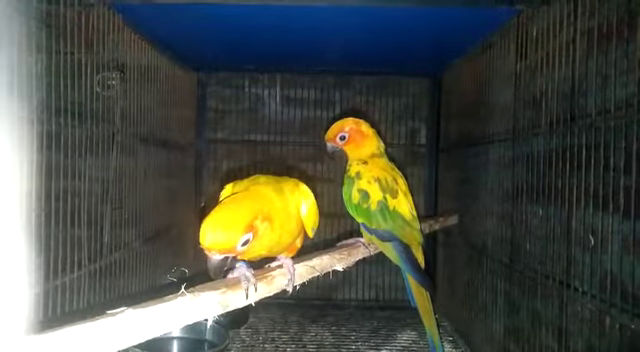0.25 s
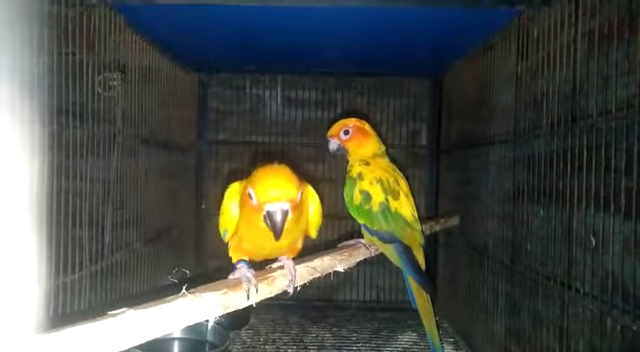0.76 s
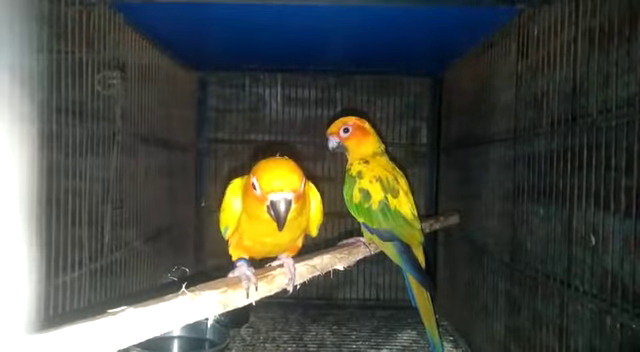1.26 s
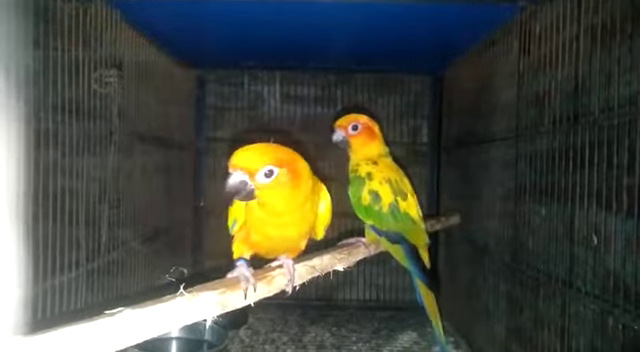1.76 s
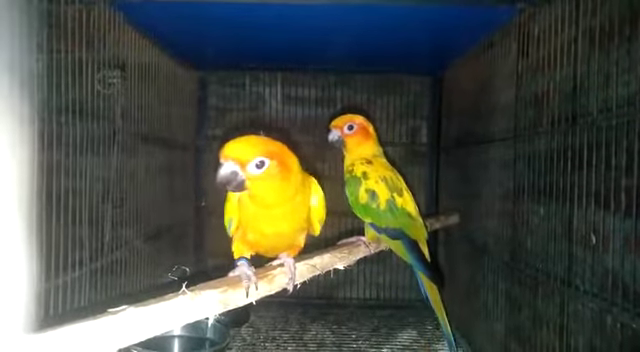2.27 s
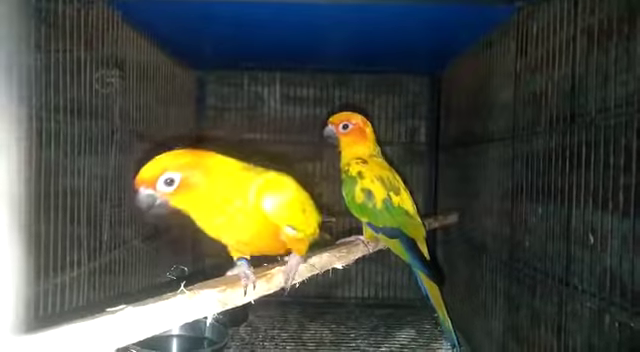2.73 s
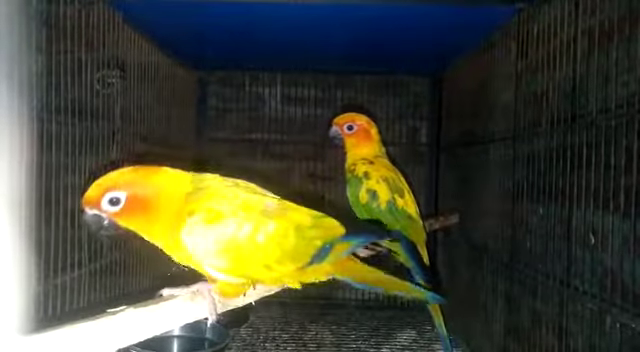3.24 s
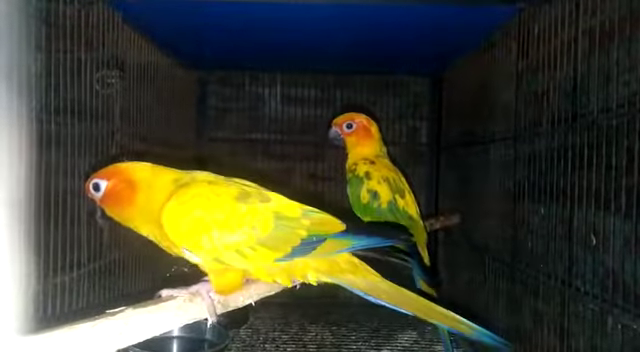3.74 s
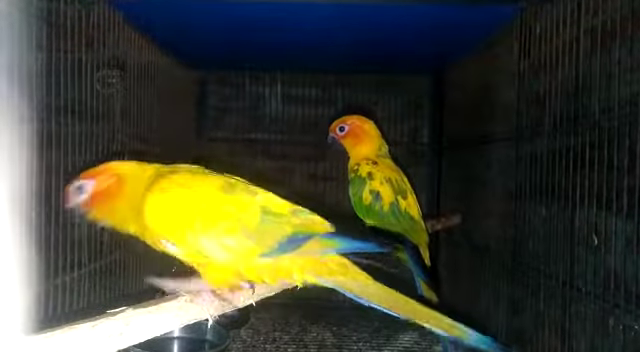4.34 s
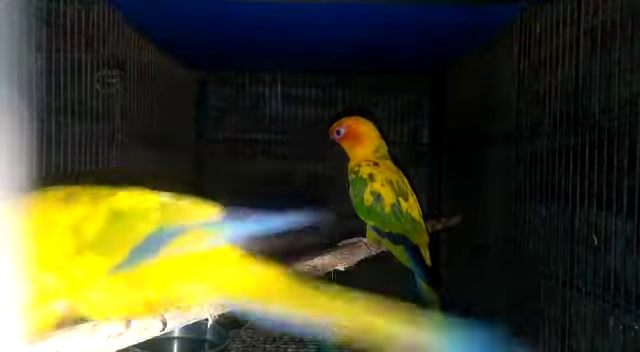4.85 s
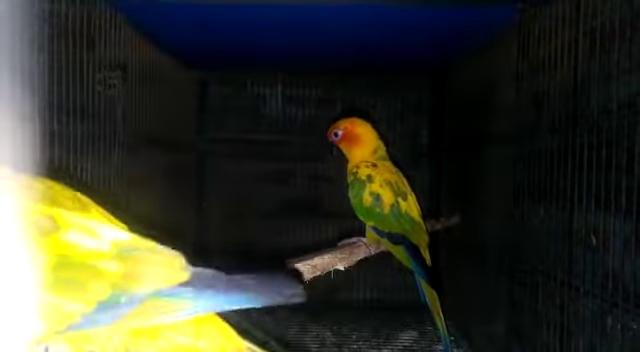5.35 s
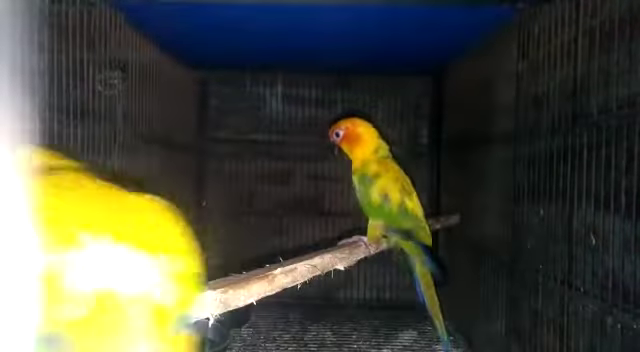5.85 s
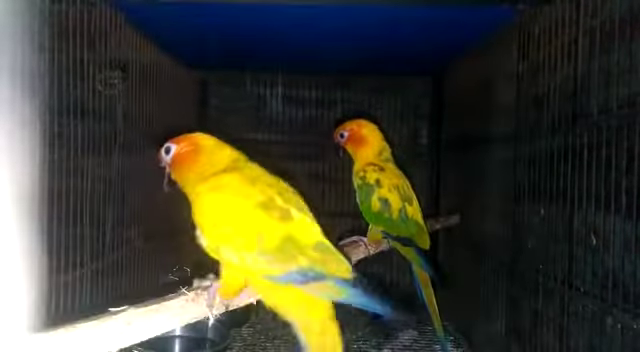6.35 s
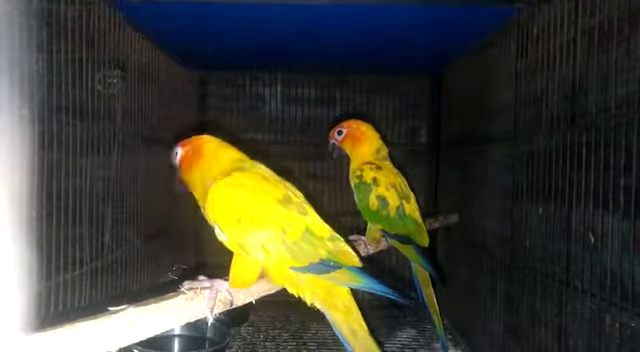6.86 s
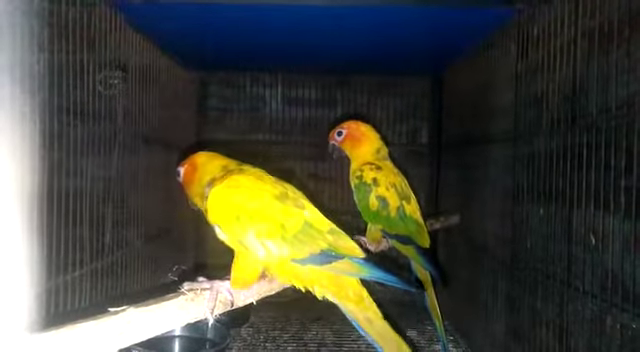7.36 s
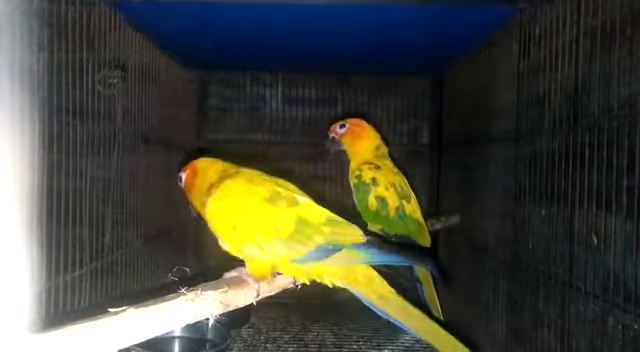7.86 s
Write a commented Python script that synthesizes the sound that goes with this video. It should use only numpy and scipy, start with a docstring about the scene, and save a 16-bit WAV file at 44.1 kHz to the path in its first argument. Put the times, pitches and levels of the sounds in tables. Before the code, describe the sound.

Harsh, rasping parrot screeches come in quick succession, mixed with brief whistled chirps and a slight room echo.

```python
"""Parrot screeching in a bare room

A parrot screeches in runs; each screech is a stack of overtones that throbs and sweeps upward
about seventy times a second. Short whistled chirps come in between, and both echo off the walls.
Rustles, a hollow drone, a cricket and a low hum fill the gaps; the highest peaks are cut flat."""
import sys
import numpy as np
from scipy import signal
from scipy.fft import rfft, irfft
from scipy.io import wavfile

SR = 44100
rng = np.random.default_rng(int(sys.argv[2]) if len(sys.argv) > 2 else 0)


def master(y):
    """Save y as 16-bit WAV."""
    cut = np.clip(np.atleast_2d(y).T, -1, 1)
    pcm = np.round(cut * 32767)  # scale
    wavfile.write(sys.argv[1], SR, pcm.astype(np.int16))


N = 357210
CUTOFF_HZ, OVERLOAD = 16000, .49

# Each row: start in seconds, crest in dB, lead-in in seconds, first throb in dB re crest, voiced time
# in seconds, pitch in Hz, final sag and sweep per throb as shares of pitch, nominal throb depth in dB,
# lead-in croak in dB, lingering croak in dB.
SCREECH_CALLS = [(2.639, -18.5, 0.074, -19.5, 0.12, 1920, .07, .62, 17.5, 2.5, -9.5),
                 (3.007, -17.5, 0.032, -15.5, 0.15, 2005, .12, 0.38, 7.5, 0, -17),
                 (3.3593, -17.5, .018, -16, 0.17, 2024, 0.14, 0.35, 1, 5.5, -36.5),
                 (3.713, -16.5, 0.028, -15.5, 0.15, 2010, 0.11, 0.31, 3, -2, -14),
                 (4.0624, -18, 0.033, -19.5, 0.17, 1999, 0.14, 0.32, 1.5, -2, -10.5),
                 (4.432, -17.5, 0.018, -16, 0.17, 1979, .12, 0.32, 4, 0.5, -13.5),
                 (4.798, -17.5, 0.032, -17.5, 0.17, 1990, 0.13, 0.29, 6, 3, -30),
                 (5.125, -17, 0.045, -13, .01, 1848, 0.012, 0.4, 8.5, -6.5, -17),
                 (5.255, -18.5, 0.0038, -16, .135, 1958, 0.11, 0.29, 7.5, -11.5, -30),
                 (5.891, -19.5, .034, -17.5, .152, 1955, 0.13, 0.36, 8, -2.5, -34),
                 (7.24, -16.5, 0.048, -23.5, 0.13, 1965, .1, 0.3, 2, -0.5, -12.5),
                 (7.606, -17.5, .03, -23.5, 0.16, 2008, 0.12, 0.3, 0.5, -1, -35),
                 (8.06, -20.5, 0.03, -17, 0.13, 1990, .12, 0.35, 15, -0.5, -24.5)]


def parrot(low_cut_hz=670):
    """Runs of screeches, with the bass cut away."""
    calls = sum(screech(screech_course(*row)) for row in SCREECH_CALLS)
    return signal.sosfilt(signal.butter(10, low_cut_hz, "high", fs=SR, output="sos"), calls + 1e-18)


def screech_course(s, crest_db, lead_s, first_db, voiced_s, hz, sag, sweep, depth_db, lead_db, linger_db):
    """A croak climbs, the voice breaks up to pitch, swells and sags, and a low croak shuts the call."""
    climb_hz_per_s, climb_db_per_s = 9500, 234
    lead_hz, close_hz, clear_db = 1222.4, 1139, -27
    climbed_hz = min(lead_hz + climb_hz_per_s * lead_s, hz)
    climbed_db = min(first_db + climb_db_per_s * lead_s, 0)
    lead_in = [(s, lead_hz, crest_db + first_db, .6 * sweep, 30, lead_db),
               (s + lead_s, climbed_hz, crest_db + climbed_db, .6 * sweep, 18, lead_db)]
    swell = min(.02505 / voiced_s, .5)
    share = np.array([0, swell, max(.42, swell), .88, 1])  # break, swell, crest, knee, end
    times_s = s + lead_s + .002 + voiced_s * share
    pitch_hz = hz * np.array([1, 1.03, 1.03, 1 - .45 * sag, 1 - sag])
    level_db = crest_db + np.array([max(-4, climbed_db), -1, 0, -2.5, -4.5])
    throb_db = depth_db + (4 - depth_db) * share
    croak_db = np.maximum(clear_db, linger_db + 20 * np.log10(1.02 - share))
    voice = np.transpose([times_s, pitch_hz, level_db, sweep * .3 ** share, throb_db, croak_db])
    end_s = times_s[-1] + .003
    close = [(end_s, close_hz, crest_db - 15, 0, 0, 0),
             (end_s + .014, close_hz - 40, crest_db - 12, 0, 0, 0)]
    return [*lead_in, *voice, *close]


# Throat resonances. Each row: frequency in Hz, gain in dB.
THROAT_RESPONSE = [(900, -23.5), (1300, -7.5), (1750, -13), (2250, -2.5), (3000, -4.5), (3900, -0.5),
                   (4800, -6.5), (5800, -0.5), (6750, -7.5), (7700, -7.5), (8700, -21.5), (9700, -14),
                   (12000, -29), (15500, -41.5)]


def screech(course, throbs_per_s=72, shimmer_db=2.4, breath_db=-31):
    """Syrinx overtones; in each throb the pitch climbs and snaps back, the level swells and dies."""
    at, (hz, db, sweep, depth_db, croak_db) = span(course)
    size = len(at)
    pace_hz = throbs_per_s * (np.linspace(.9, 1.06, size) + .05 * wobble(25, size))
    throb = np.cumsum(pace_hz) / SR % 1
    climb = signal.lfilter([.03], [1, -.97], np.sqrt(throb) - 2 / 3)
    jitter = (.007 + .06 * from_db(2 * croak_db)) * wobble(350, size)
    hz = hz * (1 + sweep * climb + jitter)
    phase = 2 * np.pi * np.cumsum(hz) / SR
    tone = 0
    for order in np.arange(2, 22) / 2:  # half orders: in a croak every second cycle differs
        level_db = at_hz(THROAT_RESPONSE, order * hz) + croak_db * (order % 1 > 0)
        level_db += shimmer_db * wobble(190, size)
        level_db -= 1.85 * order * from_db(croak_db)  # the croak is dull
        partial = np.sin(order * phase + rng.uniform(0, 2 * np.pi))
        tone = tone + from_db(level_db) * (order * hz < CUTOFF_HZ) * partial
    tone = rms_one(tone) + from_db(breath_db) * coloured(THROAT_RESPONSE)[:size]
    dip = 1.5 * np.abs(throb - .22) ** 1.5 / .7 - .3  # loudest early, gap before the snap
    pulse = from_db(signal.lfilter([.04], [1, -.96], -depth_db * dip))
    out = np.zeros(N)
    out[at] = tone * pulse * from_db(db) * signal.windows.tukey(size, .05)
    return out


# Each row: start and length in seconds, turning point as share of length, start, turn and end pitch
# in Hz, fundamental's level at the turn in dB, direct gain in dB, jitter as share of pitch,
# harmonics 2, 3 and 4 in dB re fundamental.
CHIRP_CALLS = [(0, .02, 0.098, 2196, 2184, 2184, -43.5, 6.5, 0.021, -5, 29, -6),
               (0, 0.012, 0.5, 2834, 2900, 2844, -38, -2, .06, 20, -9, 1.5),
               (.27, 0.057, 0.27, 5300, 5540, 5530, -70, -1, 0.033, -12, -40, -40),
               (0.492, 0.12, 0.13, 3250, 3503, 2070, -40.5, -4, 0.01, -9, -15.5, -45),
               (0.576, 0.057, 0.42, 325, 314, 309, -79, -4.5, 0.0095, 9, 13, 22.5),
               (2.241, 0.043, 0.38, 2550, 2210, 2010, -31.5, -13.5, 0.006, 14, -2, -0.5),
               (2.26, 0.052, 0.24, 2910, 3350, 3200, -27, -5.5, 0.12, -1, -18.5, -9),
               (2.308, 0.061, 0.25, 3170, 2562, 2675, -23.5, -2.5, 0.023, 8.5, -4, -12.5),
               (2.36, 0.021, 0.84, 4300, 6340, 6450, -14, 0, 0.045, -28, -23, -40),
               (2.435, 0.023, 0.37, 3540, 3610, 2396, -22.5, -3.5, 0.04, -2.5, -17, -60),
               (2.459, 0.021, 0.11, 4000, 3966, 3960, -19.5, -4, 0.0125, -26.5, -26.5, -37.5),
               (2.481, 0.018, 0.43, 4460, 5940, 5812, -22.5, -2, 0.0098, -29.5, -33, -40),
               (3.647, 0.024, 0.47, 2580, 2824, 2890, -41, 0.5, 0.026, 13.5, -5.5, -13.5),
               (3.674, 0.058, 0.18, 3060, 3393, 3200, -25.5, -6, 0.013, 6, -21.5, -17.5),
               (5.179, .085, .55, 2228, 2330, 2016, -25, 1.5, 0.024, 3.5, 8, -1.5),
               (5.553, 0.15, .45, 2970, 2650, 3080, -50.5, -0.5, 0.11, -4.5, -13, -41.5),
               (5.652, .075, .45, 2530, 2076, 2034, -37, -9, 0.087, -18.5, -24.5, -28),
               (5.737, .065, 0.29, 3517, 3515, 2954, -27, -8, .08, -10, -24, -31),
               (5.907, 0.016, 0.33, 2190, 2284, 2100, -22.5, -1, .012, -9, 3, -11),
               (5.912, 0.022, .6, 4290, 5100, 5480, -26, 8.5, 0.01, -15, -39.5, -40),
               (5.924, 0.03, 0.062, 6350, 6420, 6280, -17, 6.5, 0.016, -23, -35, -50),
               (6.81, 0.058, 0.31, 2724, 2650, 2571, -60, -21, 0.15, -3, -25.5, -30.5),
               (6.881, 0.059, 0.35, 2366, 2303, 2320, -65, -20, .063, -10, -10, -18),
               (7.1, 0.16, 0.25, 2570, 2770, 2600, -72.5, -11, .09, 9, -10, -19.5),
               (7.499, 0.059, 0.82, 3060, 2950, 2880, -41.5, 4, 0.039, -24, -42, -46)]


def chirps():
    """Clear or hoarse whistles with a few overtones; returns the room feed and the direct sound."""
    room_feed, direct = np.zeros((2, N))
    for s, length_s, turn, start_hz, turn_hz, end_hz, db, direct_db, jitter, *upper_db in CHIRP_CALLS:
        course = [(s, start_hz, -3), (s + turn * length_s, turn_hz, 0), (s + length_s, end_hz, -6)]
        at, (hz, arch_db) = span(course)
        phase = 2 * np.pi * np.cumsum(hz * (1 + jitter * wobble(250, len(at)))) / SR
        tone = sum(from_db(harmonic_db) * np.sin(order * phase) * (order * hz < CUTOFF_HZ)
                   for order, harmonic_db in enumerate([0, *upper_db], 1))
        shimmer_db = 2.7 * wobble(120, len(at))
        tone *= from_db(db + arch_db + shimmer_db) * signal.windows.tukey(len(at), .1)
        room_feed[at] += tone
        direct[at] += tone * from_db(direct_db)
    return room_feed, direct


# Rustle spectra. Each row: frequency in Hz, relative density in dB.
BRIGHT_SPECTRUM = [(470, -46), (800, -30.5), (1020, -2), (1390, -6), (1800, -3), (2240, -9), (4140, -13),
                   (6200, -6.5), (13300, -37), (15000, -39.5)]
DULL_SPECTRUM = [(110, -17), (180, -5), (254, -3.5), (327, -5), (385, -9), (740, -11), (1000, -9),
                 (1300, -19.5), (2200, -120)]
# Each row: start, attack and hold in seconds, level in dB, fade in dB/s, bright and dull gain in dB.
RUSTLE_SWELLS = [(1.27, 0.027, 0.077, -51.5, 93.5, 0.5, -32), (1.36, 0.011, 0.0093, -42, 75, -2, -27),
                 (1.31, 0.063, 0.13, -49, 173, -33, -2), (3.645, 0.037, 0.46, -46, 91, -40, 0),
                 (6.02, 0.032, 0.25, -58.5, 295, -33, 0), (6.2, .06, 0.0087, -55, 94, 0, -36),
                 (6.405, 0.014, 0.01, -46, 88, 0, -15), (6.41, 0.024, 0.14, -55.5, 125, -34, -1),
                 (6.7, 0.061, 0.023, -70, 300, -32, -16), (7.225, 0.02, 0.049, -49, 140, -32, 0)]


def rustles():
    """Swells of bright and dull noise, each flickering slightly."""
    bright_gain, dull_gain = swells(RUSTLE_SWELLS)
    bright = coloured(BRIGHT_SPECTRUM) * bright_gain * from_db(1.1 * wobble(40, N))
    dull = coloured(DULL_SPECTRUM) * dull_gain * from_db(1.2 * wobble(30, N))
    return bright + dull


# Lowest mode, four middle ones, a long-ringing one. Each row: centre in Hz, width in Hz, gain in dB.
HOLLOW_MODES = [(489.6, 115, -2), (1173, 230, -1), (2080, 250, -7.5), (3020, 170, -8.5), (5200, 200, -9),
                (1528, 68, 4)]
# Each row: start, attack and hold in seconds, level in dB, fade in dB/s, gains in dB of the lowest,
# middle and long-ringing modes.
DRONE_SWELLS = [(1.42, 0.043, 0.26, -63.5, 104.5, -20, 1.5, -3.5),
                (1.44, 0.091, .01, -50, 110, -1, -22, -22), (1.7, .05, 0.0673, -69.5, 153, 4.5, -4, -31),
                (1.75, 0.086, 0.051, -74, 52.5, -30, -30, 1), (2.03, 0.027, .08, -73.5, 266, 2, -30, -41),
                (6.1, 0.034, 0.084, -61.5, 55.5, 0.5, -32.5, -30),
                (6.39, .05, 0.091, -60, 40.5, 0.5, -30, -33.5), (6.47, 0.0404, 0.18, -62, 61, -26, 1, -8),
                (7.23, 0.053, 0.017, -44, 63, 0.5, -33, -28)]


def drone():
    """Noise rings in hollow modes and lingers after the rustles."""
    lowest, middle, ringing = swells(DRONE_SWELLS)
    gains = [lowest, middle, middle, middle, middle, ringing]
    return sum(from_db(db) * noise_band(hz, width_hz) * gain
               for (hz, width_hz, db), gain in zip(HOLLOW_MODES, gains))


# Each row: first chirp in seconds, spacing in seconds, chirp count, level in dB.
CRICKET_AUDIBLE_STRETCHES = [(0.3815, 0.11, 1, -72.5), (.6894, 0.098, 6, -73), (1.829, .1043, 4, -72),
                             (6.66, 0.11, 5, -71.5)]


def cricket(hz=6850, stroke_s=.014, fade_db_per_s=200):
    """A steady cricket, heard in short stretches of evenly spaced chirps of three fading wing strokes."""
    t = np.arange(round(3 * stroke_s * SR)) / SR
    strokes = np.abs(np.sin(np.pi * t / stroke_s)) * from_db(-fade_db_per_s * t)
    starts = np.zeros(N)
    for s, spacing_s, count, db in CRICKET_AUDIBLE_STRETCHES:
        times_s = s + spacing_s * np.arange(round(count))
        starts[np.round(times_s * SR).astype(int)] = from_db(db)
    return signal.fftconvolve(starts, strokes)[:N] * noise_band(hz, width_hz=300)


# Each row: frequency in Hz, relative density in dB.
HUM_SPECTRUM = [(20, -16), (50, -5.5), (75, -12), (97, 5), (125, -3), (200, -20.5), (300, -35.5),
                (600, -43.5), (2000, -47.5), (7000, -56.5), (15500, -53.5)]
# Each row: time in seconds, level in dB.
HUM_ENVELOPE = [(0.0, -55.5), (0.18, -53), (2.14, -52), (3.63, -56.5), (3.68, -42.5), (3.92, -50),
                (4.08, -44.5), (4.22, -53.5), (5.44, -51), (5.55, -50), (7.71, -50.5), (8.1, -48)]


def hum():
    """Low noise, strongest near 100 Hz, that drifts in level."""
    level_db = np.interp(np.arange(N) / SR, *np.transpose(HUM_ENVELOPE))
    return coloured(HUM_SPECTRUM) * from_db(level_db)


def room(x, t60_s=.33, wall_cut_hz=8400, echo_db=-5):
    """Dense echoes that die away evenly, dulled by the walls."""
    t = np.arange(SR // 2) / SR
    tail = rng.standard_normal(len(t)) * from_db(-60 * t / t60_s) * np.minimum(t / .003, 1)
    tail = signal.sosfilt(signal.butter(1, wall_cut_hz, fs=SR, output="sos"), tail)
    return from_db(echo_db) * signal.fftconvolve(x, tail / np.sqrt(np.sum(tail ** 2)))[:N]


def swells(events, onset_db=-20):
    """Attack, hold and fade of all events, summed into one gain curve per part."""
    gains, t = 0, np.arange(N) / SR
    for s, attack_s, hold_s, db, fade_db_per_s, *parts_db in events:
        rise_db = np.minimum(onset_db * (1 - (t - s) / attack_s), 0)
        fall_db = fade_db_per_s * np.maximum(t - s - attack_s - hold_s, 0)
        gains = gains + from_db(db + rise_db - fall_db) * (t > s) * from_db(parts_db)[:, None]
    return gains


def span(rows):
    """Sample indices from the first row's time to the last, and the other columns interpolated there."""
    times_s, *columns = np.transpose(rows)
    at = np.arange(max(round(times_s[0] * SR), 0), min(round(times_s[-1] * SR), N))
    return at, [np.interp(at / SR, times_s, column) for column in columns]


def wobble(hz, size):
    """Noise through a double one-pole low-pass; rms 1."""
    pole = np.exp(-2 * np.pi * hz / SR)
    slow = signal.lfilter([1], [1, -2 * pole, pole * pole], rng.standard_normal(size + 4000))
    return rms_one(slow[4000:])


def noise_band(hz, width_hz):
    """Band-passed noise; rms 1."""
    band = signal.butter(2, [hz - width_hz / 2, hz + width_hz / 2], "band", fs=SR, output="sos")
    return rms_one(signal.sosfilt(band, rng.standard_normal(N)))


def coloured(spectrum):
    """Noise shaped to a spectrum; rms 1."""
    hz = np.maximum(np.arange(N // 2 + 1) * SR / N, 1)
    return rms_one(irfft(rfft(rng.standard_normal(N)) * from_db(at_hz(spectrum, hz)), N))


def at_hz(spectrum, hz):
    """Level in dB, interpolated over log frequency."""
    points_hz, points_db = np.transpose(spectrum)
    return np.interp(np.log(hz), np.log(points_hz), points_db)


def from_db(db):
    """Gain of a level in dB."""
    return 10 ** (np.asarray(db) / 20)


def rms_one(x):
    """Scaled to rms 1."""
    return x / np.sqrt(np.mean(x ** 2) + 1e-20)


def scene():
    """Birds and their echoes over rustles, hum, drone and cricket; mono."""
    screeches = parrot()
    chirp_feed, chirp_direct = chirps()
    background = rustles() + hum()
    birds = screeches + chirp_direct + room(screeches + chirp_feed)
    return (birds + background + drone() + cricket())[None]


def record(dry):
    """The highest peaks are cut flat, then the top of the band is removed."""
    low_pass = signal.cheby2(12, 70, CUTOFF_HZ, fs=SR, output="sos")
    return signal.sosfilt(low_pass, np.clip(dry, -OVERLOAD, OVERLOAD))


dry = scene()
out = record(dry)
master(out)
```